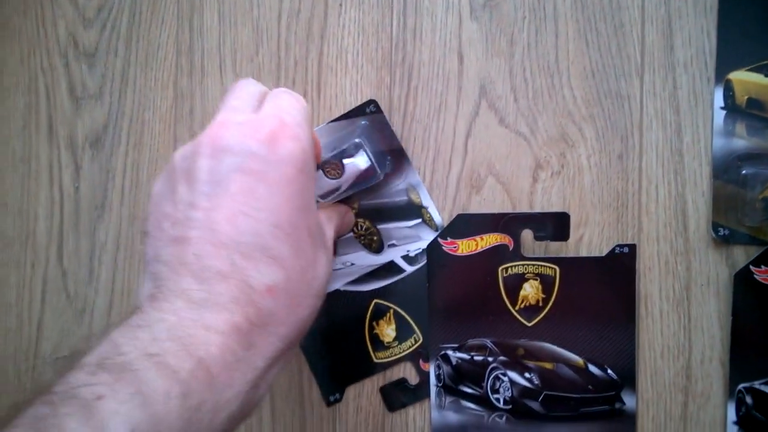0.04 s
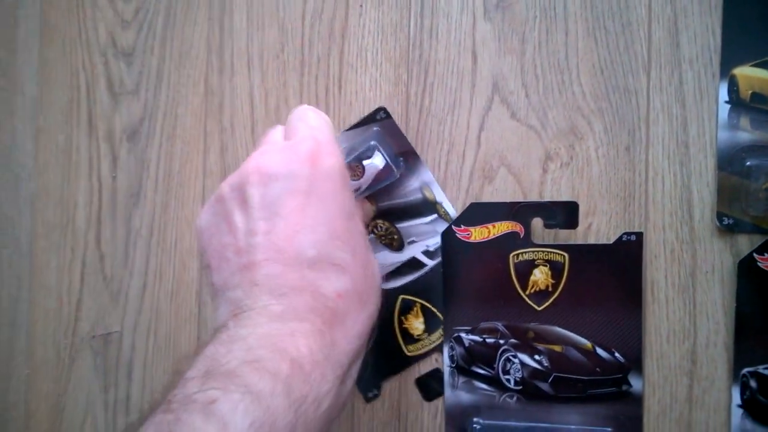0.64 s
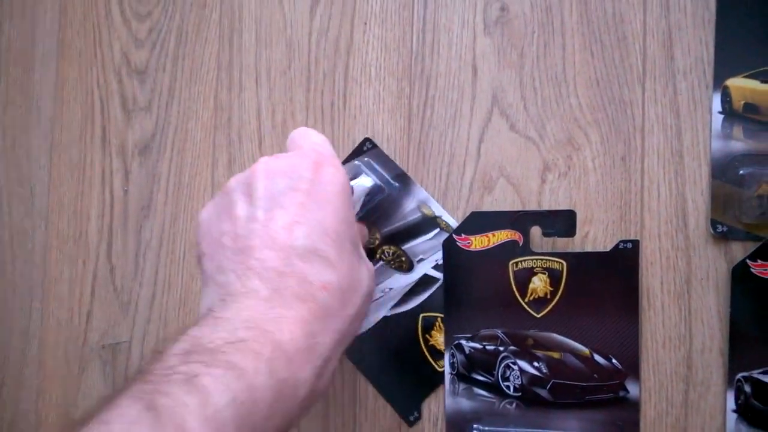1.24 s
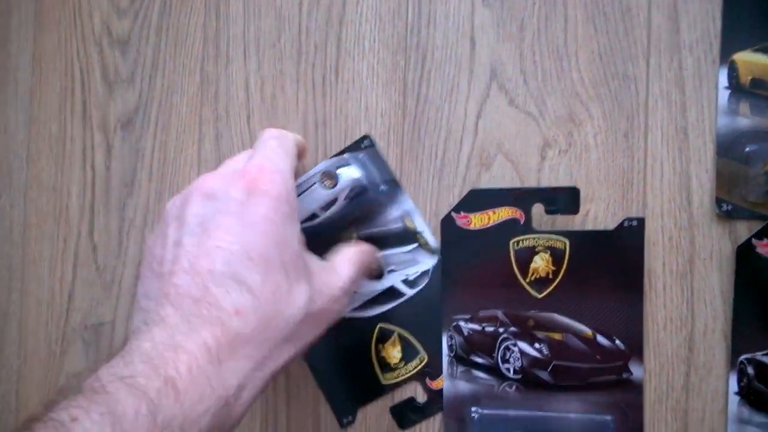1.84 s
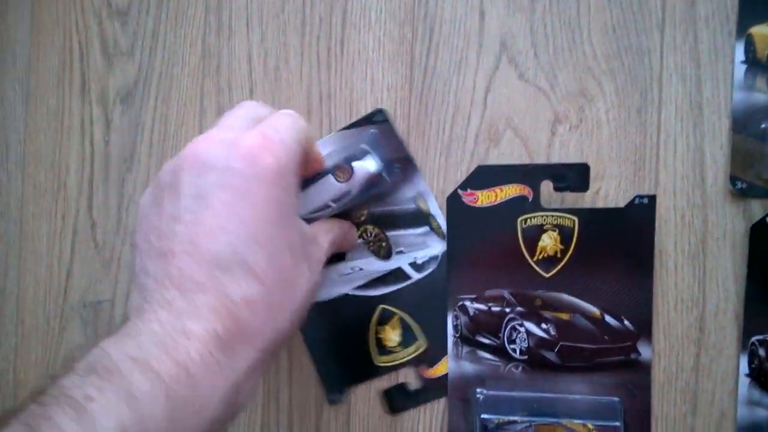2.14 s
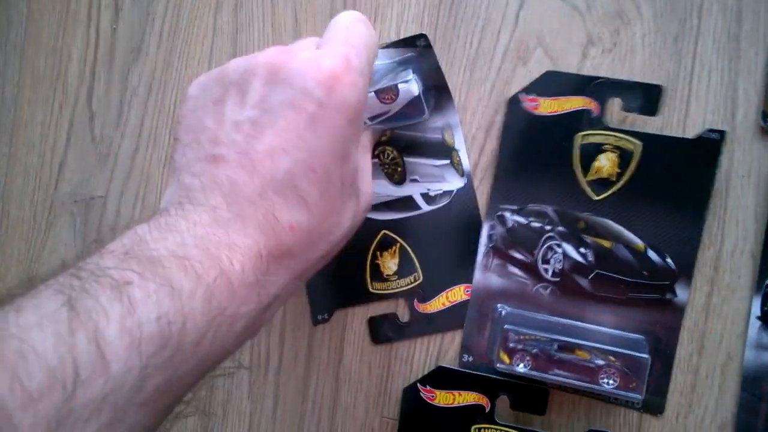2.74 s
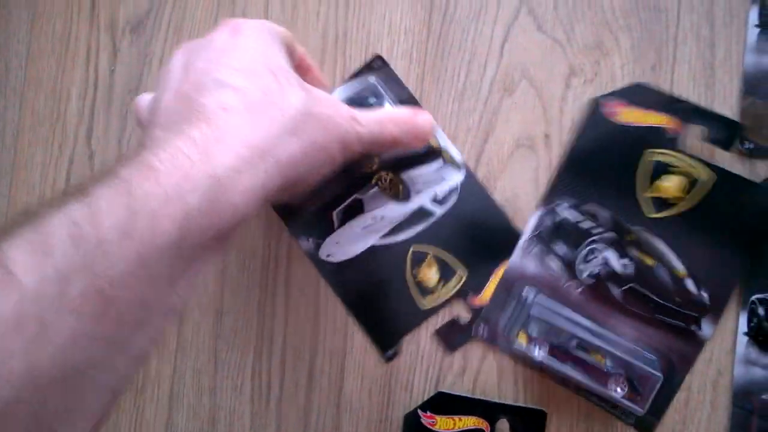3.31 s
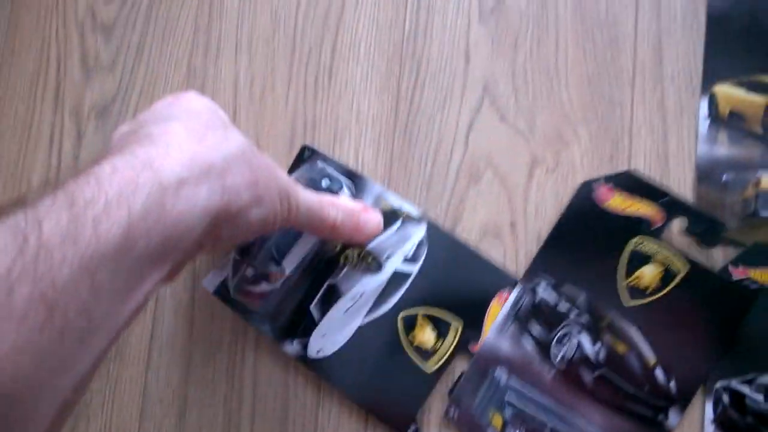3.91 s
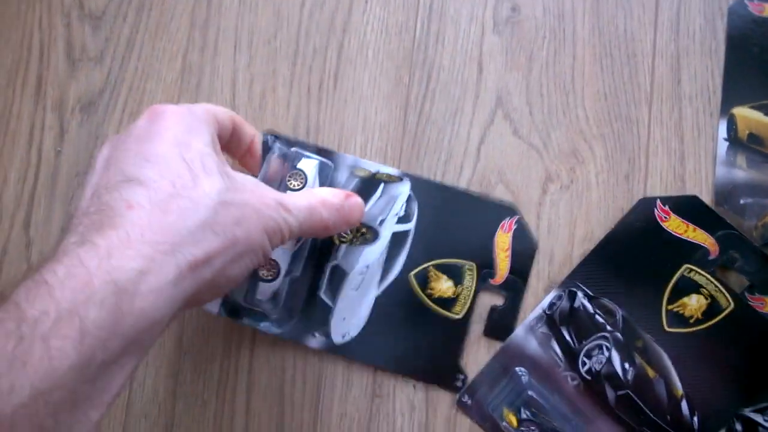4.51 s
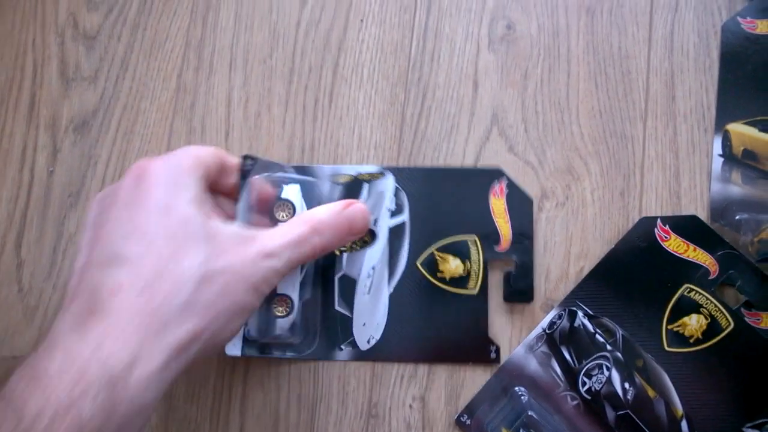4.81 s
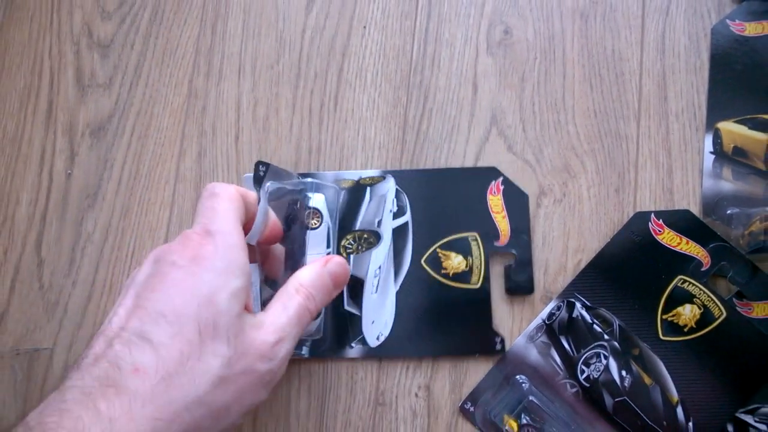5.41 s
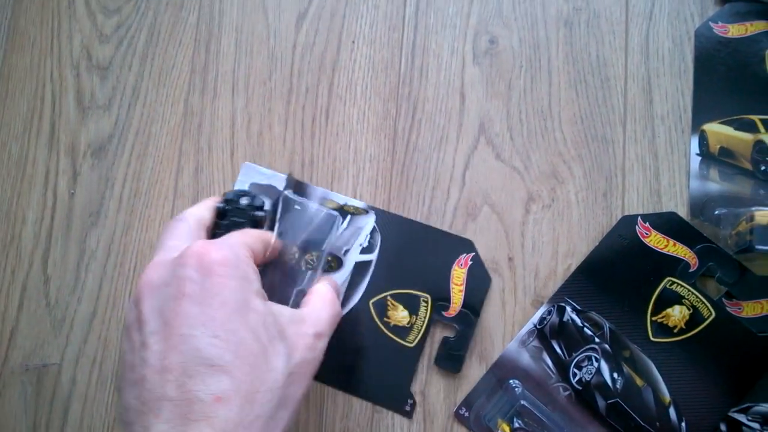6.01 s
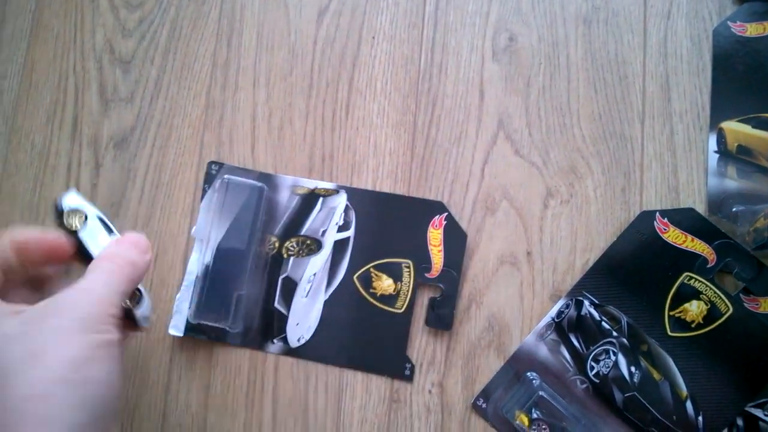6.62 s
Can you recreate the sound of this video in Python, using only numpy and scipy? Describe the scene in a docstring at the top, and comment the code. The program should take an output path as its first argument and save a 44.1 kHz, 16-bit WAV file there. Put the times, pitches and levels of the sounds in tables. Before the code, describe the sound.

Fingers rub and tap a stiff plastic blister pack, working a toy car loose. Light clicks and crinkles lead to a few sharp, hollow pops as the bubble buckles, then a quick cluster of snaps, then lighter crackling that thins out. The cardboard backing scrapes over a wooden table, which rumbles softly under the hand. The sound is close, in a small quiet room.

```python
"""A stiff plastic blister pack crinkles and pops as a hand works a toy car out of it.
Fingers rub and tap the bubble, ringing its hollow modes; the loud pops are the dome buckling.
The cardboard backing catches and slips over a wooden table, which rumbles softly under the hand.
A small room answers the pack with a short tail, over a faint hush."""
import sys
import numpy as np
from scipy import signal
from scipy.fft import rfft, irfft, next_fast_len
from scipy.io import wavfile
from scipy.ndimage import uniform_filter1d, map_coordinates

SR = 44100
rng = np.random.default_rng(int(sys.argv[2]) if len(sys.argv) > 2 else 0)


def bounce(signal):
    """Save signal as a 16-bit WAV file at the path given by the first command-line argument."""
    frames = np.transpose(np.atleast_2d(signal))
    limited = np.clip(frames, -1, 1)
    pcm = np.round(limited * 32767).astype(np.int16)
    wavfile.write(sys.argv[1], SR, pcm)


N = 293473

# Levels in the tables are relative: each layer adds its own trim.
# Resonances of the bubble with its card: pitch_hz, width_hz, level_db
PACK_MODES = [(373, 15, -24.5), (641, 93, 0.5), (804, 71, -3.5), (1110, 98, 4), (1176, 160, 3),
              (1515, 250, 1), (1677, 100, -4.5), (2377, 96, -5.5), (2460, 65, -2), (3087, 140, -4),
              (3800, 1000, -10), (5140, 130, -32), (6950, 440, -12), (9450, 360, -20.5)]
# A finger or the card slides, dull on wood, bright on plastic; a firm stroke also rings the pack:
# start_s, length_s, level_db, brightness_db_per_octave, swell_db, ring_db
SLIDES = [(-0.02, 0.043, -42, -3.5, -15.5, -51), (0.117, 0.059, -69, -2.5, 11, -64),
          (0.324, 0.11, -54, -3, -9, -47), (0.417, 0.22, -52, -1, -8.5, -71),
          (0.786, 0.087, -53, -1.5, 0, -59), (0.92, 0.033, -58, -4.5, 4, -61),
          (1.048, 0.12, -58, -0.5, -7, -54), (1.258, 0.023, -62.5, -6.5, 0.5, -57),
          (1.339, 0.039, -58, -1, -6, -59.5), (1.475, 0.12, -52.5, -.5, 4, -62),
          (1.637, 0.058, -40, -2, -13, -49), (2.033, 0.059, -46.5, -1.5, -4.5, -58),
          (2.163, .11, -47, -2.5, -0.5, -53.5), (2.29, 0.56, -56.5, -5, -5.5, -53),
          (2.529, 0.083, -40.5, 0.5, 17, -52), (2.612, 0.22, -51.5, -2, -9, -57),
          (2.865, 0.021, -58, 0, -2, -53), (2.974, 0.057, -53, -6.5, 0, -35),
          (3.267, 0.15, -64.5, -4, 2.5, -64), (3.509, 0.012, -63, -5, 1, -70.5),
          (3.602, 0.02, -55.5, -2.5, -1, -64.5), (3.689, 0.044, -55, -5, 4.5, -65),
          (3.796, 0.088, -44.5, -0.5, 4.5, -42), (3.901, 0.15, -53, -2.5, -4.5, -52.5),
          (4.048, 0.12, -52.5, -0.5, 3, -61.5), (4.171, 0.15, -42, -1.5, -13.5, -45.5),
          (4.346, 0.15, -46.5, -.5, 11.5, -37), (4.55, .11, -46.5, 0.5, -2, -42.5),
          (4.667, 0.15, -57.5, -4.5, -7.5, -45.5), (4.878, 0.047, -67, 2.5, 12.5, -62),
          (4.922, 0.032, -54, -1, 0, -37), (5.026, 0.096, -51, -.5, -6, -55),
          (5.169, .2, -53.5, 2, 10.5, -50), (5.387, 0.2, -64.5, 1.5, -1, -53),
          (5.55, 0.15, -52.5, 3, -4.5, -41), (5.75, .22, -54, 2, 1.5, -52),
          (6.079, 0.014, -65.5, 4.5, 2.5, -64), (6.15, .062, -61, -1.5, 9, -45),
          (6.275, .055, -58, -2, -5.5, -60)]
# Tone of the sliding noise: frequency_hz, level_db
SCUFF_SPECTRUM = [(200, 0), (400, -2.5), (640, -7.5), (880, 1.5), (1100, -2), (1700, -12), (2200, -6.5),
                  (4000, -14.5), (6800, -17), (11400, -27), (15800, -44)]
# Borders of a slide's scuff, rasp and hiss bands: edge_hz
SLIDE_BANDS = [400, 2000, 5000, 15000]
# Tone of a crease snapping in the plastic: frequency_hz, level_db
CRACK_SPECTRUM = [(150, -20.5), (500, -7), (1300, 1.5), (2200, -3), (6500, -16.5), (10000, -28),
                  (13000, -43.5), (16000, -45)]
# Fingertips, nails and card edges tap the pack: start_s, level_db, brightness_db_per_octave, thump_db
TAPS = [(0.141, -58, -4.5, -71), (0.28, -60, -11, -63), (0.325, -65.5, -16, -78), (0.346, -50.5, -12, -50),
        (0.352, -51.5, -6.5, -37), (0.403, -46.5, -8.5, -39), (0.431, -40.5, -6, -39),
        (0.445, -41.5, -1, -59), (0.514, -43.5, -7.5, -34.5), (0.526, -36, 0.5, -53), (0.594, -51, 1, -46),
        (0.808, -58.5, -13.5, -55), (0.871, -48.5, -10, -54), (0.933, -51, -5.5, -77),
        (0.966, -51, -4.5, -75), (1.032, -63, -14.5, -56), (1.048, -47.5, -8, -41.5),
        (1.093, -51, -9.5, -71), (1.115, -52.5, -7.5, -66), (1.268, -58.5, -7, -50.5),
        (1.335, -57, -7.5, -66.5), (1.353, -55.5, -7.5, -40), (1.372, -55, -8.5, -61.5),
        (1.508, -46.5, -2, -67.5), (1.588, -43, -2.5, -58), (1.645, -48.5, -7.5, -44),
        (1.662, -44, -0.5, -51), (1.689, -36.5, -2.5, -52.5), (2.02, -49, 0, -66),
        (2.042, -41.5, -1.5, -51), (2.061, -40, -2.5, -45), (2.114, -44, 0.5, -65), (2.16, -44, -5, -43),
        (2.311, -45.5, -6, -36.5), (2.363, -45, -5.5, -34), (2.526, -43, -6.5, -46),
        (2.822, -46, -8.5, -32.5), (2.873, -60, -10, -34), (2.976, -56, -16.5, -35.5),
        (3.032, -56.5, -10.5, -42.5), (3.053, -63, 9, -36.5), (3.387, -57, -9, -55),
        (4.057, -41, -0.5, -39), (4.077, -43, -2, -40), (4.213, -30, -6, -50), (4.218, -54, -0.5, -32.5),
        (4.327, -62.5, -20, -39), (4.367, -40.5, 3.5, -31), (4.39, -44.5, -2.5, -45.5),
        (4.742, -51.5, -10, -42.5), (4.8, -62, -11, -47), (4.936, -41, -1.5, -50),
        (5.034, -45.5, -1.5, -48), (5.093, -53, -4.5, -50), (5.151, -58, 11.5, -80), (5.204, -44, -6, -46),
        (5.256, -57.5, -13, -41.5), (5.346, -34.5, 1.5, -64), (5.354, -46.5, 7.5, -67),
        (5.4, -50.5, -9, -68), (5.458, -54, 2, -78), (5.519, -59.5, 8, -52.5), (5.573, -38.5, 1.5, -42.5),
        (5.657, -45, 0, -44.5), (5.77, -54, -2, -58), (5.858, -42.5, 0, -52), (5.89, -40, -1, -36.5),
        (5.91, -56.5, 14.5, -69), (5.964, -73, -18, -40), (6.144, -73, -12, -45.5), (6.182, -72, -16, -62),
        (6.601, -62.5, 6.5, -88.5), (6.636, -64, 11, -92)]
# Borders of the thump, dome, crack and fizz bands of taps and crinkles: edge_hz
TAP_BANDS = [150, 600, 2000, 5000, 14000]
# The hand leans on the table: start_s, length_s, level_db, swell_db
LEANS = [(0.33, 0.13, -60, 6), (0.437, 0.15, -50, -2), (0.6, 1, -66.5, 2), (2.2, 0.43, -55.5, -3),
         (2.65, 0.29, -75, -6.5), (3.8, 1.8, -71, 0), (5.854, .08, -57.5, -4)]
# Tone of the table top's rumble: frequency_hz, level_db
RUMBLE_SPECTRUM = [(30, -14), (55, 4.5), (70, 4.5), (90, -7.5), (122, 9.5), (160, -8), (230, 0.5),
                   (330, -17.5), (500, -34), (900, -59.5)]
# The bubble buckles: start_s, pitch_semitones, thump_db, card_db, dome_db, crack_db, fizz_db
BUCKLES = [(1.71, -0.5, -34.5, -21, -19.5, -31, -42), (2.176, .5, -59.5, -27, -30, -31, -45),
           (2.6009, -0.6, -32, -32, -18.5, -23, -34.5), (3.7307, 0, -46, -27, -35.5, -48, -76),
           (3.7858, 2.5, -44, -26.5, -17, -29.5, -54.5), (4.1601, -0.4, -41, -23, -17.5, -21.5, -28),
           (4.4027, -.5, -65, -25, -16, -24.5, -34.5), (4.5031, -1, -47.5, -29, -28.5, -40, -41.5),
           (4.5884, -1.5, -39.5, -29, -32.5, -53, -47.5), (4.6633, 0, -42, -27.5, -21, -32.5, -71)]
# Borders of a pop's thump, card, dome, crack and fizz bands: edge_hz
POP_BANDS = [150, 480, 900, 2000, 5000, 14000]
# The pack is dragged flat over the table: start_s, length_s, level_db, swell_db
CARD_DRAGS = [(2.185, 0.11, -40, -0.5), (2.37, 0.16, -45.5, -4.5), (4.549, 0.15, -47, 2),
              (5.24, 0.085, -54, -8)]
# Top treble, dull while the hand covers the pack and open when it lies bare: time_s, gain_db
HAND_SHADE = [(0, -5), (2.2, -6), (2.55, -1), (3.3, -6), (3.9, 4), (4.3, -1), (4.6, 1.5), (5.35, 6.5),
              (5.9, -1.5)]
# Decay of the small room: frequency_hz, t60_s
ROOM_DECAY = [(150, 0.66), (500, 0.25), (1400, 0.34), (3700, 0.34), (9000, 0.22), (15000, 0.23)]
# Tone of the room's hush: frequency_hz, level_db
HUSH_SPECTRUM = [(12, -38.5), (20, 1), (83, -8.5), (261, -19.5), (335, -21), (397, -19.5), (469, -21),
                 (524, -18), (942, -24.5), (1320, -35), (2370, -24.5), (10700, -34), (15800, -36)]

SLIDE_ATTACK_S, SLIDE_RELEASE_DB_PER_S = 0.014, 259
PIVOT_HZ = 2940  # brightness tilts a contact's tone about this frequency


def amp(db):
    """Decibels to gain."""
    return 10 ** (np.asarray(db) / 20)


def unit(x):
    """Scale to rms 1."""
    return x / np.sqrt(np.mean(x ** 2) + 1e-20)


def along(points, hz):
    """Read (frequency_hz, value) points on a log frequency axis."""
    frequencies, values = np.transpose(points)
    return np.interp(np.log(hz + 1), np.log(frequencies + 1), values)


def octaves(edges):
    """Octaves from the pivot to each band's centre."""
    edges = np.array(edges)
    return np.log2(np.sqrt(edges[:-1] * edges[1:]) / PIVOT_HZ)


def wobble(rate_hz):
    """A smooth random modulator."""
    knots = rng.standard_normal(int(N * rate_hz / SR) + 4)
    return map_coordinates(knots, [np.arange(N) * rate_hz / SR])


def filtered(x, response):
    """Apply a frequency response, given as a function of hz."""
    length = x.shape[-1]
    padded = next_fast_len(length + 4096)
    return irfft(rfft(x, padded) * response(np.fft.rfftfreq(padded, 1 / SR)), padded)[..., :length]


def coloured(x, spectrum):
    """EQ by (frequency_hz, level_db) points, then scale to rms 1."""
    return unit(filtered(x, lambda hz: amp(along(spectrum, hz))))


def band(x, low_hz, high_hz):
    """Causal band-pass."""
    return signal.sosfilt(signal.butter(3, [low_hz, high_hz], "bandpass", fs=SR, output="sos"), x)


def gesture(start_s, length_s, level_db, swell_db, attack_s, release_db_per_s):
    """Envelope of one movement: it takes hold, swells or slackens, and lets go."""
    t = np.arange(N) / SR - start_s
    held_db = level_db + swell_db * (np.clip(t / length_s, 0, 1) - 0.5)
    return np.clip(t / attack_s, 0, 1) * amp(held_db - release_db_per_s * np.maximum(t - length_s, 0))


def slide_envelopes():
    """All slides summed in power, as four envelopes: ring, scuff, rasp and hiss."""
    power = 1e-12
    for start_s, length_s, level_db, brightness, swell_db, ring_db in SLIDES:
        stroke = gesture(start_s, length_s, 0, swell_db, SLIDE_ATTACK_S, SLIDE_RELEASE_DB_PER_S)
        bands_db = level_db + brightness * octaves(SLIDE_BANDS)
        power = power + np.outer(amp([ring_db, *bands_db]), stroke) ** 2
    return np.sqrt(power)


def stick_slip(rate_hz, spread_db, smooth_db):
    """Tiny slips of uneven size over smooth friction noise."""
    slips = (rng.random(N) < rate_hz / SR) * rng.choice([-1, 1], N)
    sizes = amp(spread_db * np.minimum(rng.exponential(size=N), 3.5))
    return unit(unit(slips * sizes) + amp(smooth_db) * rng.standard_normal(N))


def stutter(rate_hz, decay_s, depth):
    """A sliding edge catches at random moments and lets go with a short surge."""
    catches = (rng.random(N) < rate_hz / SR) * rng.uniform(0, depth, N)
    surges = signal.lfilter([1], [1, -np.exp(-1 / (decay_s * SR))], catches)
    return unit(1 + surges)


def drifting(x, depth_db):
    """A scrape's colour wanders, as when moving fingers damp different parts of the pack."""
    spectrogram = signal.stft(x, nperseg=512)[2]
    drift = uniform_filter1d(rng.standard_normal(spectrogram.shape), size=6, axis=0)  # over frequency
    drift = uniform_filter1d(drift, size=22, axis=1)  # over time
    return signal.istft(spectrogram * amp(depth_db * unit(drift)), nperseg=512)[1][:N]


def rubbing(envelopes):
    """Card stutters over wood; skin glides over the plastic with a finer, grainy hiss."""
    card_slips = stick_slip(rate_hz=900, spread_db=3.5, smooth_db=0.5)
    card_slips *= stutter(rate_hz=54, decay_s=0.0026, depth=3.0)
    card = drifting(coloured(card_slips, SCUFF_SPECTRUM), depth_db=1.35) * amp(0.73 * wobble(70))
    skin_slips = stick_slip(rate_hz=1600, spread_db=7.5, smooth_db=3)
    skin = drifting(coloured(skin_slips, SCUFF_SPECTRUM), depth_db=2.4)
    layers = zip((card, card, skin), envelopes, SLIDE_BANDS, SLIDE_BANDS[1:])
    scuff, rasp, hiss = (envelope * unit(band(x, low, high)) for x, envelope, low, high in layers)
    return amp(-4.5) * scuff + amp(-1.08) * rasp + amp(-2.52) * hiss


def pack_ring(force, pitch_ratio, grip_db=0):
    """A force rings the hollow pack; the grip bends its modes and shifts their strengths."""
    pitches_hz, widths_hz, levels_db = np.transpose(PACK_MODES)
    gains = amp(levels_db + grip_db) * (-1) ** np.arange(len(PACK_MODES))  # alternating polarity
    modes = list(zip(pitches_hz * pitch_ratio, widths_hz, gains))
    return filtered(force, lambda hz: sum(gain * 1j * hz * width / (pitch**2 - hz**2 + 1j * hz * width)
                                          for pitch, width, gain in modes))


def judder(envelope):
    """A firm slide catches and slips in quick ticks that ring the hollow pack."""
    slips = stick_slip(rate_hz=700, spread_db=1.8, smooth_db=-4)
    slips *= stutter(rate_hz=75, decay_s=0.0035, depth=4.5)
    ring = band(pack_ring(slips, pitch_ratio=0.93), 480, 1363)
    return amp(-4.0) * envelope * unit(drifting(ring, depth_db=3.5))


def strikes(rows, edges, rise_s, snap_t60_s, push_db, push_s, chatter_db, chatter_t60_s, crack_db,
            pitch_spread, grip_spread_db):
    """A push and a burst of slips ring the pack. Rows: start_s, pitch_semitones, level_db per band."""
    size, onset, lead = 6144, SR // 100, SR // 2000  # samples
    t = np.arange(size) / SR
    snap, chatter = amp(-60 * t / snap_t60_s), amp(chatter_db - 60 * t / chatter_t60_s)
    burst = (1 - np.exp(-t / rise_s)) * (snap + chatter)
    push = amp(push_db) * unit(t * np.exp(-t / push_s))  # too blunt to reach the high modes
    starts_s, semitones, *bands_db = np.transpose(rows)
    contacts = []
    for ratio in 2 ** (semitones / 12):
        force = push + unit(burst * rng.standard_normal(size))
        bent_ratio = ratio * np.exp(pitch_spread * rng.normal())
        ring = pack_ring(force, bent_ratio, grip_spread_db * rng.standard_normal(len(PACK_MODES)))
        # creases in the plastic radiate directly, without ringing
        crack = burst * coloured(rng.standard_normal(size), CRACK_SPECTRUM)
        contacts.append(unit(ring) + amp(crack_db) * unit(crack))
    hits = 0
    for low, high, level_db in zip(edges, edges[1:], bands_db):
        part = band(np.array(contacts), low, high)
        gains = amp(level_db) / part[:, :onset].std(axis=1)  # the level is that of the first 10 ms
        hits = hits + part * gains[:, None]
    track = np.zeros(N + size)
    for start_s, hit in zip(starts_s, hits):
        at = max(0, round(start_s * SR) - lead)
        track[at:at + size] += hit
    return track[:N]


def crinkles(envelopes, count, spread_db, thump_db):
    """Small creases give way at random under a sliding finger, as strong and bright as its stroke."""
    jitter, strength = rng.random((count, 2)).T
    at = ((np.arange(count) + jitter) / count * (N - 1)).astype(int)
    low_db, mid_db, high_db = 20 * np.log10(envelopes[:, at]) + spread_db * (strength - 1)
    rows = np.column_stack([at / SR, np.zeros(count), low_db + thump_db, low_db, mid_db, high_db])
    return amp(0.2) * strikes(
        rows, TAP_BANDS, rise_s=0.0002, snap_t60_s=0.014, push_db=-11, push_s=0.00014,
        chatter_db=-30.5, chatter_t60_s=0.06, crack_db=-0.5, pitch_spread=0.05, grip_spread_db=2)


def taps():
    """Light taps, each trailing a short scrape: a nail is bright, a fingertip dull."""
    colour_db = np.array([-0.8, 2.5, -1.5])  # dome, crack, fizz
    rows = [(start_s, 0, thump_db, *(level_db + colour_db + brightness * octaves(TAP_BANDS[1:])))
            for start_s, level_db, brightness, thump_db in TAPS]
    return amp(-1.32) * strikes(
        rows, TAP_BANDS, rise_s=0.00063, snap_t60_s=0.047, push_db=-8, push_s=0.000095,
        chatter_db=-14.5, chatter_t60_s=0.12, crack_db=-3.5, pitch_spread=0.06, grip_spread_db=4)


def table_rumble():
    """The table top rumbles unevenly under the moving hand."""
    weight = sum(gesture(*lean, attack_s=0.05, release_db_per_s=151) for lean in LEANS)
    sway = unit(amp(2.2 * wobble(24)))
    return weight * sway * coloured(rng.standard_normal(N), RUMBLE_SPECTRUM)


def pops():
    """The dome buckles, flipping through within a few milliseconds with a loud snap."""
    return amp(1.0) * strikes(
        BUCKLES, POP_BANDS, rise_s=0.00065, snap_t60_s=0.019, push_db=-5.5, push_s=0.00011,
        chatter_db=-21.0, chatter_t60_s=0.19, crack_db=-3.5, pitch_spread=0.0033, grip_spread_db=5.5)


def dragging(centre_hz=640):
    """The card's edge skips over the wood in hollow ticks that hum near the pack's lowest strong mode."""
    envelope = sum(gesture(*drag, SLIDE_ATTACK_S, SLIDE_RELEASE_DB_PER_S) for drag in CARD_DRAGS)
    slips = stick_slip(rate_hz=460, spread_db=2, smooth_db=0)
    slips *= stutter(rate_hz=90, decay_s=0.003, depth=4)
    hum = band(pack_ring(slips, pitch_ratio=0.96), centre_hz / 1.25, centre_hz * 1.25)
    return amp(-3.5) * envelope * unit(hum)


def hand_shadow(x, shelf_hz=8900):
    """A moving high shelf: the covering hand blocks the shortest waves, the bare pack sounds brighter."""
    times_s, gains_db = np.transpose(HAND_SHADE)
    shelf_db = np.interp(np.arange(N) / SR, times_s, gains_db)
    treble = filtered(x, lambda hz: 1 - 1 / (1 + (hz / shelf_hz) ** 10))
    return x + (amp(shelf_db) - 1) * treble


def room(x, gap_s):
    """Walls answer after a short gap; crossfaded tails change the answer as the pack moves about."""
    anchors = np.linspace(0, N, num=14)
    reverb = np.zeros(N)
    for share in np.eye(len(anchors)):
        hz, t, noise = signal.stft(rng.standard_normal(SR // 2), SR, nperseg=256)
        decay = amp(-60 * t / along(ROOM_DECAY, hz)[:, None])
        tail = signal.istft(noise * decay, SR, nperseg=256)[1]
        tail *= 1 - np.exp(-(np.arange(len(tail)) / SR / gap_s) ** 2)
        crossfade = np.sqrt(np.interp(np.arange(N), anchors, share))
        reverb += signal.oaconvolve(x * crossfade, tail / np.linalg.norm(tail))[:N]
    return reverb


def scene():
    """Mono mix: the pack up front, with the room's answer, table rumble and hush beneath it."""
    envelopes = slide_envelopes()
    ring, friction = envelopes[0], envelopes[1:]
    sliding = dragging() + judder(ring) + rubbing(friction)
    creases = crinkles(friction, count=150, spread_db=9, thump_db=-11.5)
    direct = hand_shadow(sliding + creases + pops() + taps())
    hush = amp(-69.5) * coloured(rng.standard_normal(N), HUSH_SPECTRUM)
    return (direct + amp(-8.0) * room(direct, gap_s=0.0015) + table_rumble() + hush)[None]


def record(dry):
    """A brick-wall low-pass takes off the very top."""
    return filtered(dry, lambda hz: hz < 15900)


dry = scene()
out = record(dry)
bounce(out)
```